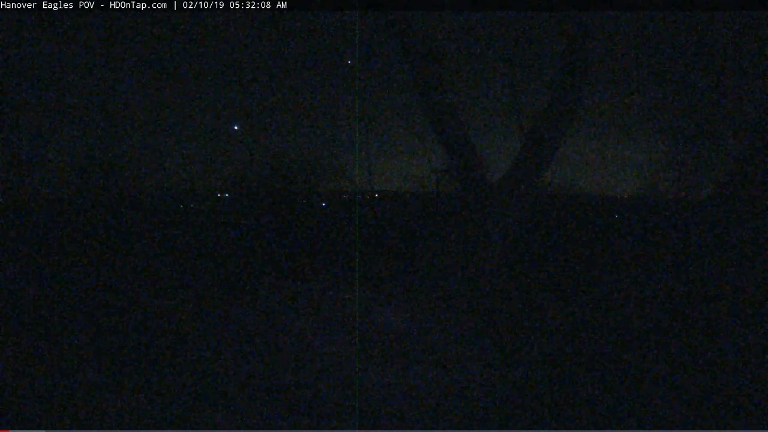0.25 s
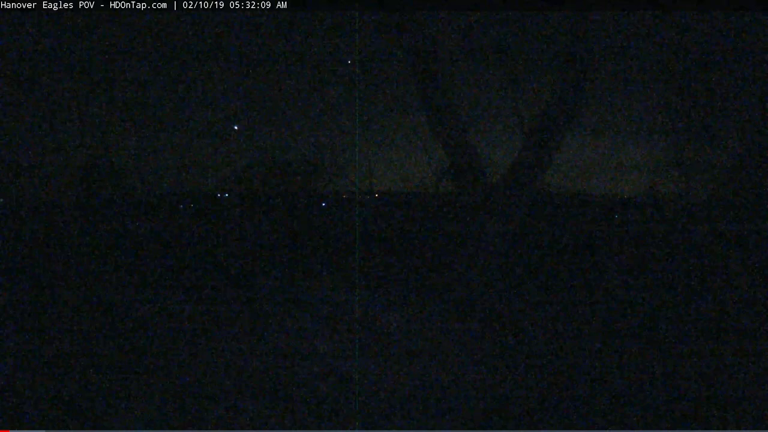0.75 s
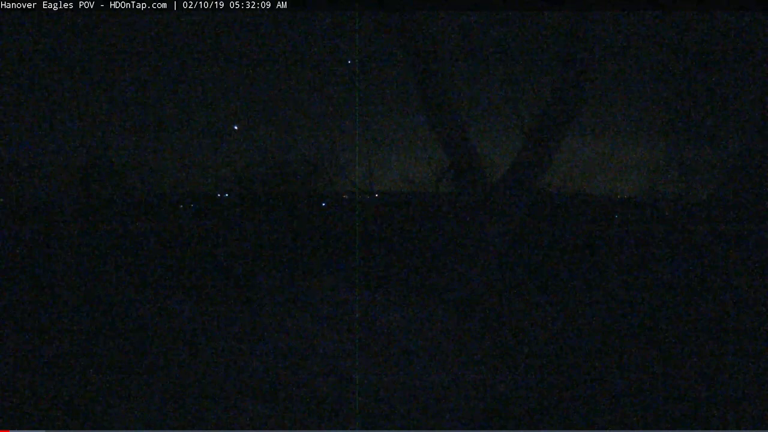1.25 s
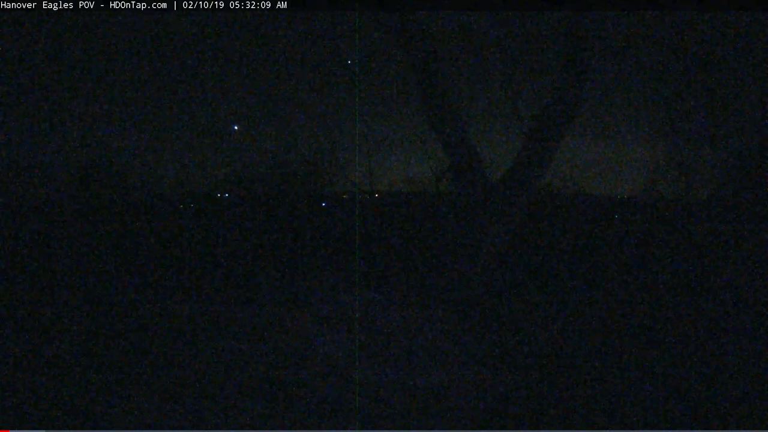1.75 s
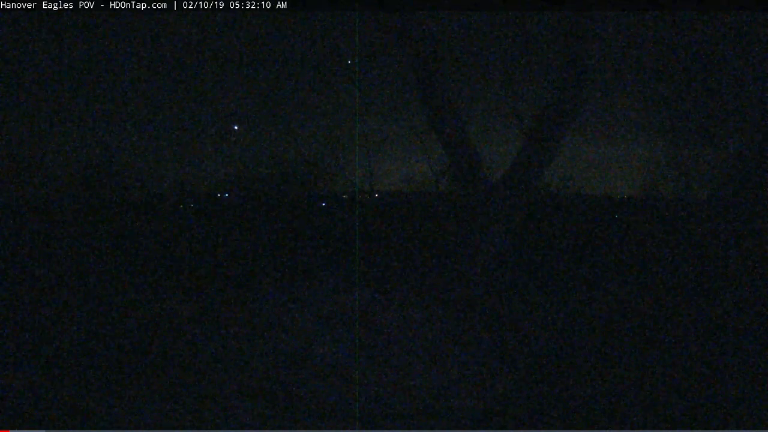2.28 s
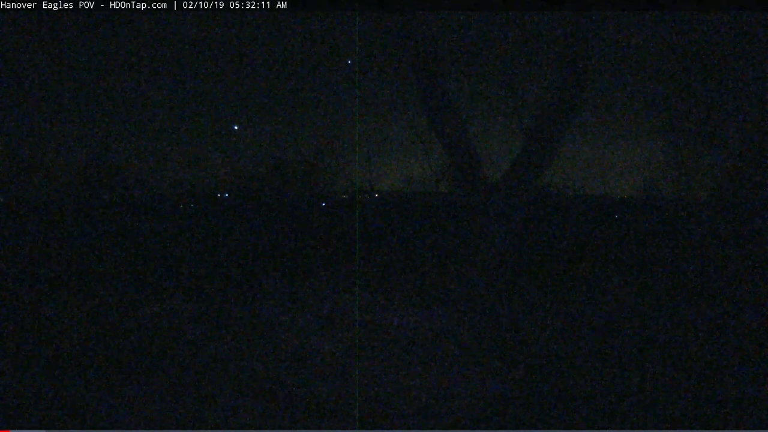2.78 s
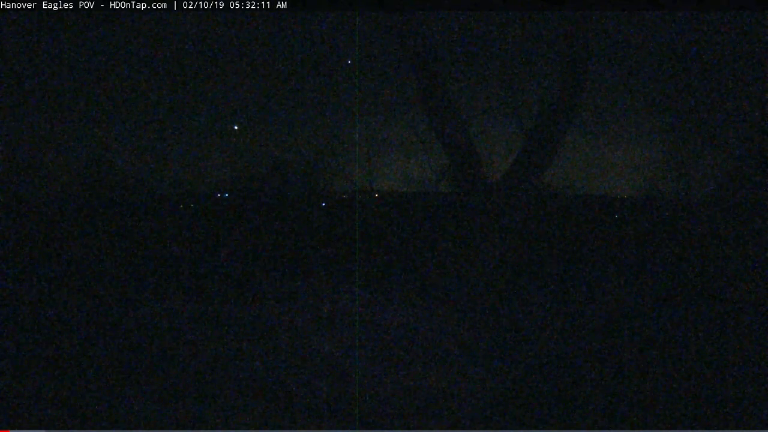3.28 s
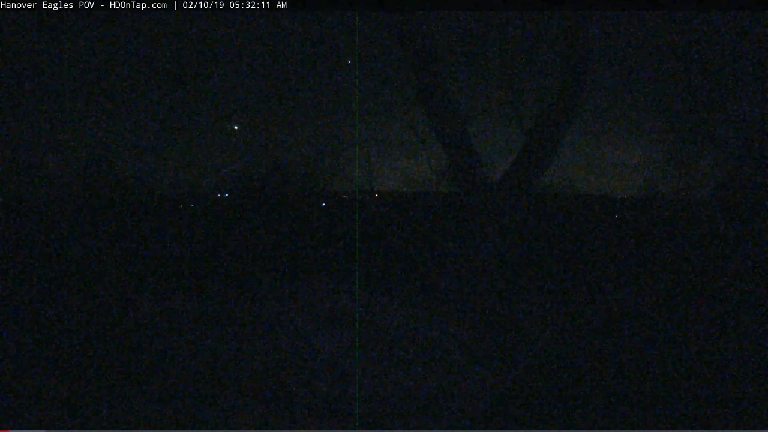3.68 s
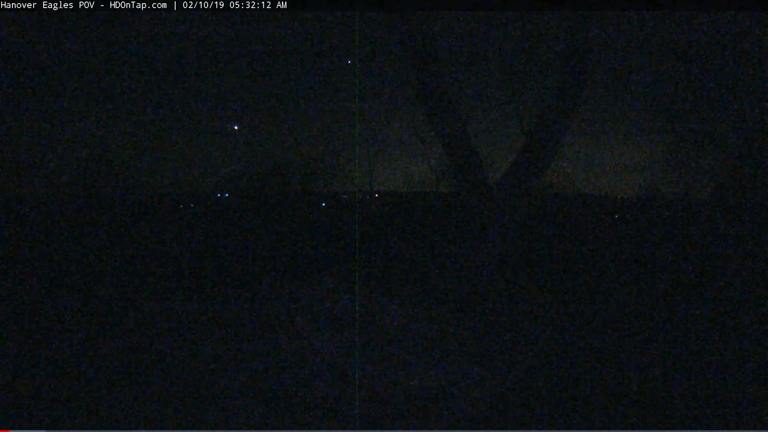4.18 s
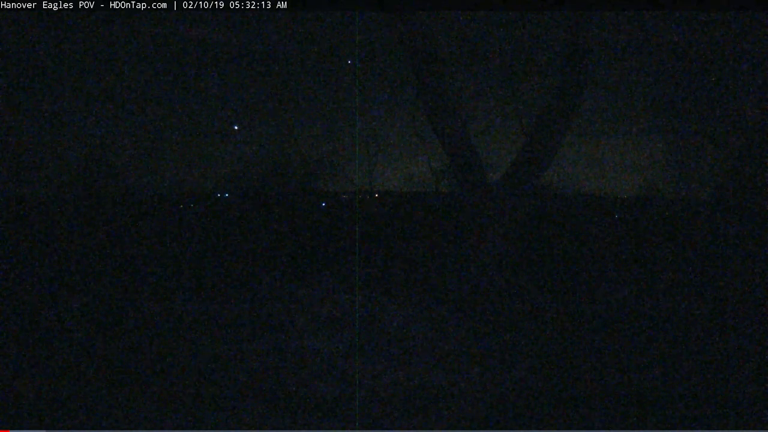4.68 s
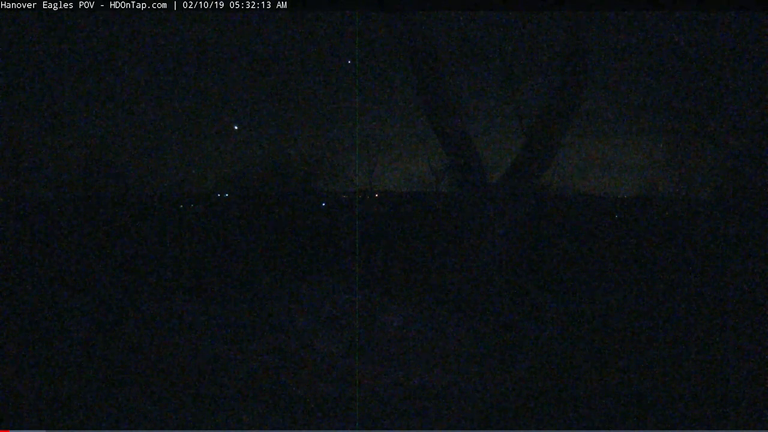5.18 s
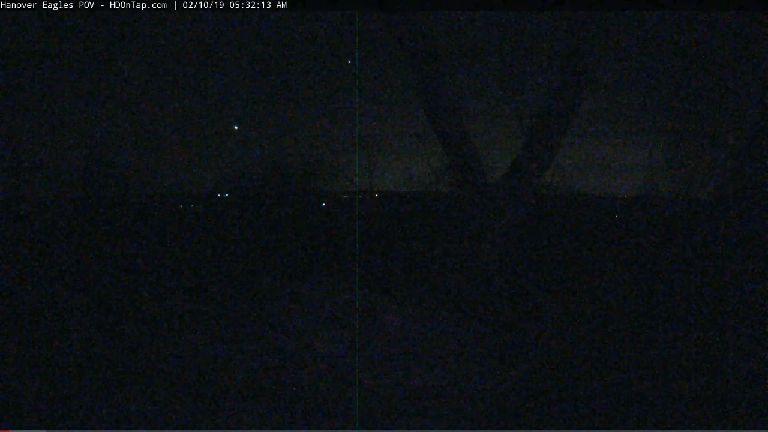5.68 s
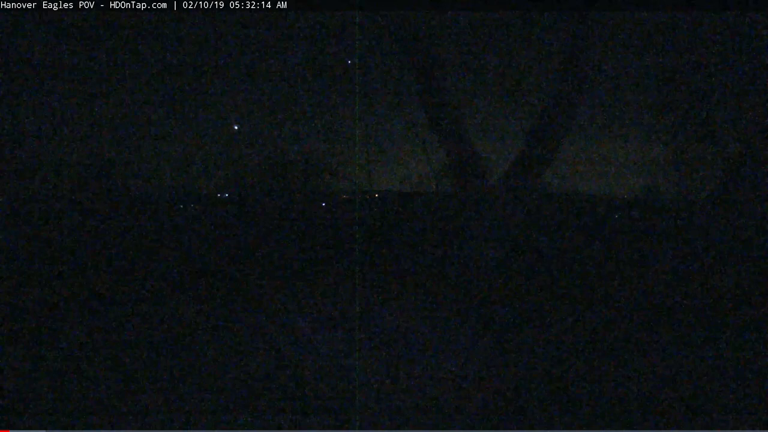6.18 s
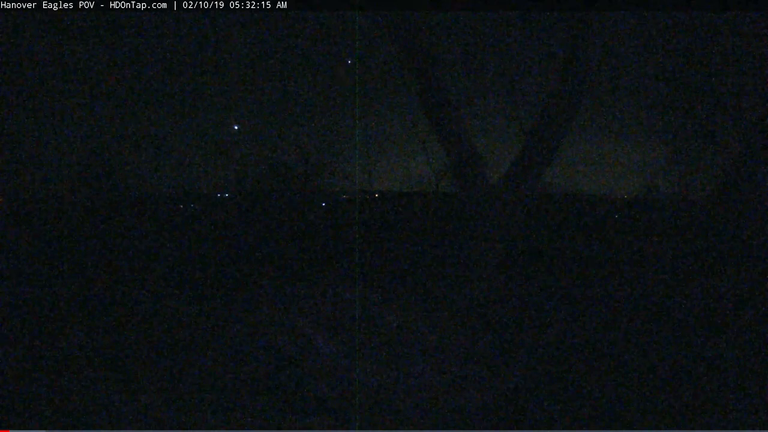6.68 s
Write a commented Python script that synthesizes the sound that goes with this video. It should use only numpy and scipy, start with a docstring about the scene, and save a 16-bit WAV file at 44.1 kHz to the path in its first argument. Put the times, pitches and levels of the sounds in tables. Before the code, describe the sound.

The sound opens on the fading ring of a low eagle call in a wood at night. From about 0.3 to 1.1 seconds one eagle gives a high bout of seven quick, raspy, staccato squeals that grow louder and then drop in pitch. After a pause, a second eagle answers from 2.9 to 4.1 seconds with a lower, much louder bout, stepping down in pitch as it ends. The high bird calls again from 4.7 to 5.4 seconds with six falling squeals. The trees ring for a second or so after each bout. A limb shudders faintly with the notes, with slightly firmer dull bumps near 0.7, 3.1 and 5 seconds. Steady hiss, low rumble and a faint electrical hum and whine continue until the end at about 7 seconds. Tyres sing faintly on a far road during the first three seconds and again around 5.5. The sound is nearly mono.

```python
"""A low eagle call rings away in a wood before dawn; then two eagles near their nest call in turn:
a high bout, a loud lower one, a high one again. Each bout starts with rasps, breaks into staccato
squeals from both sides of the syrinx and falls in pitch; the trees ring on after it.
A limb shudders with each note. Behind lie a steady hiss, a low rumble, a faint electrical whine
and tyres on a far road."""
import sys
import numpy as np
from scipy import signal
from scipy.fft import rfft, irfft
from scipy.io import wavfile

SR = 44100
rng = np.random.default_rng(int(sys.argv[2]) if len(sys.argv) > 2 else 0)


def log_audio(samples):
    """Write samples as a 16-bit WAV file to the path given in sys.argv[1]."""
    # one column per channel
    frames = np.atleast_2d(samples).T
    # limit to full scale, then quantise
    limited = np.clip(frames, -1, 1)
    pcm = np.round(limited * 32767).astype(np.int16)
    wavfile.write(sys.argv[1], SR, pcm)


N = 306054
LEAD = SR // 2   # samples before t = 0

# Pairs: (high bird, low bird). Sag: closing fall as a share of the pitch, for a crest at SAG_REF_HZ.
SAG, SECOND_SAG, SAG_REF_HZ = (0.036, 0.085), (0.049, 0.125), 2500
SECOND_BASE_S, SECOND_LENGTH_SHARE, SECOND_ROUGH = (0.012, 0.011), (0.57, 0.33), (0.36, 0.38)
RASP_LEAD_S, RASP_LENGTH_S = (0.02, 0.0046), (0.043, 0.028)
RASP_TILT_DB_PER_OCT, RASP_DULLING_DB_PER_OCT_S = (9, 3.5), (22, 3)

# Bouts: (bird: 0 high, 1 low; notes). Note: t/s, length/s, crest f/Hz, level/dB, roughness/0-1,
# second side f/Hz, second side level/dB, second side lag/s, rasp level/dB
CALL_BOUTS = [ (1, [(-.30, 0.04, 2465, -24.5, 0.52, 3130, -39, 0, -53),
              (-.14, 0.025, 2361, -24.5, 0.54, 1896, -27, 0.011, -59)]),
              (0, [(.322, 0.046, 4516, -50, 0.53, 3640, -47.5, 0.0036, -52),
              (.446, 0.035, 4600, -41.5, 0.5, 5420, -52.5, -0.019, -48),
              (.552, 0.039, 4640, -38, 0.57, 5553, -54, -0.0042, -53),
              (.681, 0.031, 4469, -30, 0.46, 3620, -58, 0, -51),
              (.803, 0.03, 4436, -30, 0.44, 3570, -52, -0.009, -54),
              (.934, 0.03, 3650, -37, 0.42, 4320, -40, -0.0065, -52),
              (1.066, 0.018, 3543, -43.5, 0.46, 4000, -62, -0.016, -52)]),
              (1, [(2.868, .018, 3335, -54.5, 0.1, 4040, -54.5, 0.0019, -61),
              (2.989, 0.012, 3370, -43.5, 0.3, 4020, -53, 0.0026, -50),
              (3.120, 0.074, 2589, -20, 0.23, 1980, -39, -.006, -38.5),
              (3.243, 0.045, 3212, -22, 0.18, 2448, -25.5, 0.0079, -35.5),
              (3.373, .041, 3218, -22, 0.16, 2390, -25, 0.019, -33),
              (3.518, 0.029, 2570, -20, 0.34, 1997, -38, 0.021, -38.5),
              (3.669, 0.012, 2380, -20, 0.26, 2107, -30.5, 0.015, -49),
              (3.830, 0.015, 1996, -21, .05, 1287, -49.5, .023, -57.5),
              (4.030, 0.017, 1843, -41.5, 0, 1355, -49.5, -0.0026, -65)]),
              (0, [(4.662, 0.033, 4390, -33.5, 0.58, 3620, -52.5, -0.00062, -50.5),
              (4.783, 0.042, 4560, -37, 0.65, 5310, -59, 0, -47),
              (4.923, 0.03, 4413, -31, 0.45, 5500, -64.5, -.005, -47),
              (5.060, 0.034, 4348, -31.5, 0.43, 3620, -53, -0.0023, -51),
              (5.197, 0.017, 4245, -35.5, 0.45, 3580, -46, 0.015, -60),
              (5.324, .016, 3337, -31.5, 0.19, 4200, -48.5, -0.0055, -60)])]


def eagles():
    """Each note: a rasp, an arching squeal and another from the second side of the syrinx."""
    out = np.zeros(LEAD + N)
    for bird, notes in CALL_BOUTS:
        bout_start_s = notes[0][0]
        for s, length_s, hz, db, rough, second_hz, second_db, lag_s, rasp_db in notes:
            add(out, s - RASP_LEAD_S[bird], from_db(rasp_db) * rasp(bird, s - bout_start_s))
            add(out, s, from_db(db) * squeal(arch(length_s, hz, SAG[bird]), rough))
            second_length_s = SECOND_BASE_S[bird] + SECOND_LENGTH_SHARE[bird] * length_s
            second_pitch = arch(second_length_s, second_hz, SECOND_SAG[bird])
            second_side = squeal(second_pitch, SECOND_ROUGH[bird], richer_db=1.5)
            add(out, s + lag_s, from_db(second_db) * second_side)
    beak_squeak = squeal(arch(length_s=0.006, crest_hz=7800, sag=0.25), rough=1)
    add(out, 0.416, from_db(-57) * beak_squeak)   # once, as the beak opens
    return out


def arch(length_s, crest_hz, sag, crest_at=0.42, climb_per_s=3.0, flat_start_s=0.02):
    """Pitch in Hz through a note: climbs as the pressure builds, sags as it fails."""
    u = np.linspace(0, 1, int(length_s * SR))
    climb = np.clip(1 - u / crest_at, 0, 1)
    sink = np.clip((u - crest_at) / (1 - crest_at), 0, 1)
    start_drop = climb_per_s * (length_s - flat_start_s)   # the shortest notes start above the crest
    end_drop = sag * SAG_REF_HZ / crest_hz
    return crest_hz * (1 - start_drop * climb ** 2 - end_drop * sink ** 2)


# Tone colour of the squeals' overtones, with dips near 6 and 10 kHz: f/Hz, gain/dB
OVERTONE_COLOUR = [(4000, 2.5), (5100, 3), (5700, -11), (6100, -19), (6500, -12), (7600, 2.5), (8800, 0),
                   (9600, -15), (11000, -15)]
# Air rushing through the open beak: f/Hz, relative density/dB
BREATH_SPECTRUM = [(600, -33), (1600, 5.5), (3000, 16), (4500, -15), (6300, -10.5), (8200, -8.5),
                   (11000, -24), (14000, -32)]


def squeal(pitch_hz, rough, richer_db=0, jitter=0.034, flutter_db=2.5, beat_hz=190, breath_db=-26):
    """A nearly pure whistle; a strained membrane shakes in pitch and strength and leaks air."""
    n = len(pitch_hz)
    pitch_hz = pitch_hz * (1 + jitter * rough * drift(rate_hz=260)[:n])
    phase = 2 * np.pi * np.cumsum(pitch_hz) / SR
    tone = np.sin(phase)
    for harmonic, clean_db in ((2, -27.5), (3, -41.5)):
        source_db = clean_db + richer_db - 11 * rough
        colour_db = at_hz(OVERTONE_COLOUR, harmonic * pitch_hz)
        tone += from_db(source_db + colour_db) * np.sin(harmonic * phase)
    # part of the membrane runs flat and beats against the rest
    beat_phase = 2 * np.pi * (beat_hz * np.arange(n) / SR + rng.random())
    tone += 1.7 * rough ** 2 * np.sin(phase - beat_phase)
    flutter = from_db(flutter_db * rough * drift(rate_hz=140)[:n])
    breath = from_db(breath_db) * rough * coloured(BREATH_SPECTRUM, size=8192)[:n]
    return swell(n, rise=0.28, fall=0.27) * (unit_rms(tone * flutter) + breath)


# Throat resonances, high bird then low bird: f/Hz, section width/Hz, relative level/dB
THROAT_MODES = [
    [(3610, 480, 5.5), (4540, 95, 11.5), (5430, 280, -10), (8160, 600, -24.5)],
    [(1806, 370, -2), (3224, 99, 12.5), (3830, 280, -4), (5060, 880, -21.5), (7500, 1500, -45)],
]


def rasp(bird, into_bout_s, grain_db=2.5):
    """Before the whistle locks in, the syrinx rattles and rings the throat, duller as the bout goes on."""
    n = int(RASP_LENGTH_S[bird] * SR)
    tilt_db_per_oct = RASP_TILT_DB_PER_OCT[bird] - RASP_DULLING_DB_PER_OCT_S[bird] * into_bout_s
    rattle = rng.standard_normal(8192) * from_db(grain_db * drift(rate_hz=130))
    throat = sum(from_db(db + tilt_db_per_oct * np.log2(hz)) * resonate(rattle, hz, width_hz)
                 for hz, width_hz, db in THROAT_MODES[bird])
    settled = throat[-n:]
    return swell(n, rise=0.4, fall=0.35) * settled / np.std(settled)


# Ring of the wood: f/Hz, t60/s, relative level/dB
RING_BANDS = [(1000, 0.41, -19.5), (2200, 1.796, -6.5), (3280, 1.07, 1.5), (4260, 0.99, -2),
              (8500, 0.35, -2)]
# Reflections from limbs and ground: delay/s, gain/dB
REFLECTIONS = [(.0052, -14), (0.0119, -27.5), (0.045, -28.5)]


def wood(x, wet_db=0, build_s=0.02, branch_t60_s=0.22, grove_delay_s=0.059, grove_spread_s=0.019):
    """Direct sound plus the long ring, scatter from near branches and the next trees, and echoes."""
    t = np.arange(2 * SR) / SR
    hz = np.fft.rfftfreq(len(t), 1 / SR)
    white = rfft(rng.standard_normal(len(t)))
    centres_hz = [band[0] for band in RING_BANDS]
    ring = 0
    for weights, (_, t60_s, db) in zip(np.eye(len(RING_BANDS)), RING_BANDS):
        band_noise = irfft(white * np.interp(hz, centres_hz, weights))
        ring += band_noise * from_db(db - 60 * t / t60_s)
    response = ring * (1 - np.exp(-t / build_s)) / np.sqrt(SR / 20)
    branches = from_db(-60 * t / branch_t60_s)
    grove = np.exp(-0.5 * ((t - grove_delay_s) / grove_spread_s) ** 2)
    for envelope, db in ((branches, -7.5), (grove, -9.5)):
        response += from_db(db) * unit_rms(envelope * rng.standard_normal(len(t))) / np.sqrt(len(t))
    for delay_s, db in REFLECTIONS:
        response[round(delay_s * SR)] += from_db(db)
    return x[LEAD:] + from_db(wet_db) * signal.fftconvolve(x, response)[LEAD:LEAD + N]


# Firmer bumps carried through the tree: t/s, peak level/dB
TREE_BUMPS = [(0.664, -40), (0.839, -47), (3.106, -41), (3.801, -49), (5.05, -42.5), (5.541, -50),
              (6.011, -49.5)]
# Shudder of the limb: f/Hz, relative density/dB
LIMB_SPECTRUM = [(15, -25.5), (40, 3), (70, -7.5), (105, 1.5), (135, -2), (180, -24.5), (300, -17),
                 (900, -65.5)]


def limb_bumps(length_s=0.067, crest_factor_db=7.5, push_lead_s=0.02):
    """Short, dull shudders of a limb: a slight one from the push behind each note, a few firmer ones."""
    pushes = [(s - push_lead_s, -45.5 + 0.22 * note_db)
              for _, notes in CALL_BOUTS for s, _, _, note_db, *_ in notes]
    bump = swell(int(length_s * SR), rise=0.19, fall=0.38)
    envelope = np.zeros(LEAD + N)
    for s, peak_db in pushes + list(TREE_BUMPS):
        add(envelope, s, from_db(peak_db - crest_factor_db) * bump)
    return envelope[LEAD:] * coloured(LIMB_SPECTRUM)


# Steady hiss: f/Hz, relative density/dB
HISS_SPECTRUM = [(80, -7), (220, -5), (320, -5.5), (600, -8), (1000, -10.5), (1280, -9), (1650, 3),
                 (2050, -1.5), (2400, -11.5), (3200, -20), (4500, -23.5), (6300, -32), (8000, -25),
                 (9700, -31.5), (12500, -26), (15000, -32)]


def hiss(level_db=-55):
    """Steady noise, strongest near 1650 Hz."""
    return from_db(level_db) * coloured(HISS_SPECTRUM)


# Low rumble: f/Hz, relative density/dB
RUMBLE_SPECTRUM = [(20, 2), (42, -5), (62, 1.5), (88, -5), (120, -5), (170, -0.5), (250, -14.5),
                   (400, -24.5), (900, -64)]


def rumble(level_db=-56, wander_db=3.5):
    """Low noise whose level wavers unevenly."""
    uneven = coloured(RUMBLE_SPECTRUM) * from_db(wander_db * drift(rate_hz=9, size=N))
    return from_db(level_db) * unit_rms(uneven)


# Electrical lines: f/Hz, rms level/dB
ELECTRICAL_LINES = [(60, -66), (119, -67.5), (2106, -64.5)]


def electrical_whine():
    """Steady sines: a low hum and a thin whine."""
    t = np.arange(N) / SR
    return sum(from_db(db) * np.sqrt(2) * np.sin(2 * np.pi * hz * t) for hz, db in ELECTRICAL_LINES)


# Tyres singing on a far road: t/s, length/s, f/Hz, width/Hz, level/dB
TYRE_NOTES = [(-.3, .85, 800, 63, -59.5), (0.329, 0.83, 677, 19, -64), (0.958, 0.51, 619, 49, -69),
              (2.098, 0.65, 552, 36, -71.5), (5.5, 0.58, 752, 26, -69)]


def road():
    """Distance smears the note of the tyres into a narrow, wavering band."""
    out = np.zeros(LEAD + N)
    for s, length_s, hz, width_hz, db in TYRE_NOTES:
        n = int(length_s * SR)
        phase = 2 * np.pi * hz * np.arange(n) / SR
        band = sum(drift(width_hz, size=2 * SR)[:n] * wave(phase) for wave in (np.sin, np.cos))
        add(out, s, from_db(db) * swell(n, rise=0.25, fall=0.3) * unit_rms(band))
    return out[LEAD:]


def from_db(db):
    """Decibels to gain."""
    return 10 ** (np.asarray(db) / 20)


def unit_rms(x):
    """Scale to rms 1."""
    return x / np.sqrt(np.mean(x ** 2) + 1e-20)


def at_hz(points, hz):
    """Read a table on a log-frequency axis."""
    points_hz, values = np.transpose(points)
    return np.interp(np.log(np.maximum(hz, 1)), np.log(points_hz), values)


def coloured(spectrum, size=N):
    """Noise with a given spectrum, rms 1."""
    gain = from_db(at_hz(spectrum, np.fft.rfftfreq(size, 1 / SR)))
    return unit_rms(irfft(rfft(rng.standard_normal(size)) * gain, size))


def drift(rate_hz, size=8192):
    """Smooth random wander, rms 1."""
    hz = np.fft.rfftfreq(size, 1 / SR)
    lowpass = (hz > 0) / (1 + (hz / rate_hz) ** 4)
    return unit_rms(irfft(rfft(rng.standard_normal(size)) * lowpass, size))


def resonate(x, hz, width_hz):
    """Steep resonance of three equal sections, peak gain 1."""
    r = np.exp(-2 * np.pi * width_hz / SR)
    gain = (1 - r * r) / 2
    section = [gain, 0, -gain, 1, -2 * r * np.cos(2 * np.pi * hz / SR), r * r]
    return signal.sosfilt([section] * 3, x)


def swell(n, rise, fall):
    """Rounded envelope of n samples; rise and fall are shares of its length."""
    u = np.linspace(0, 1, n)
    attack = np.sin(np.pi / 2 * np.clip(u / rise, 0, 1)) ** 2
    release = np.sin(np.pi / 2 * np.clip((1 - u) / fall, 0, 1)) ** 2
    return attack * release


def add(track, start_s, sound):
    """Mix a sound into a track that has a lead-in."""
    at = max(LEAD + round(start_s * SR), 0)
    track[at:at + len(sound)] += sound


def scene(side_db=-23.5, side_low_hz=200):
    """Near-mono stereo: a faint side signal of reverberation and hiss above the bass."""
    birds = eagles()
    mid = wood(birds) + hiss() + rumble() + electrical_whine() + road() + limb_bumps()
    reverberation = wood(birds, wet_db=3) - birds[LEAD:]
    highpass = signal.butter(4, side_low_hz, "high", fs=SR, output="sos")
    side = signal.sosfilt(highpass, reverberation + hiss())
    return mid + from_db(side_db) * side * np.array([[1], [-1]])


def record(dry, cutoff_hz=14700, dc_offset=0.0513):
    """Steep low-pass plus a constant offset."""
    lowpass = signal.ellip(10, 0.1, 80, cutoff_hz, fs=SR, output="sos")
    return signal.sosfilt(lowpass, dry) + dc_offset


dry = scene()
out = record(dry)
log_audio(out)
```